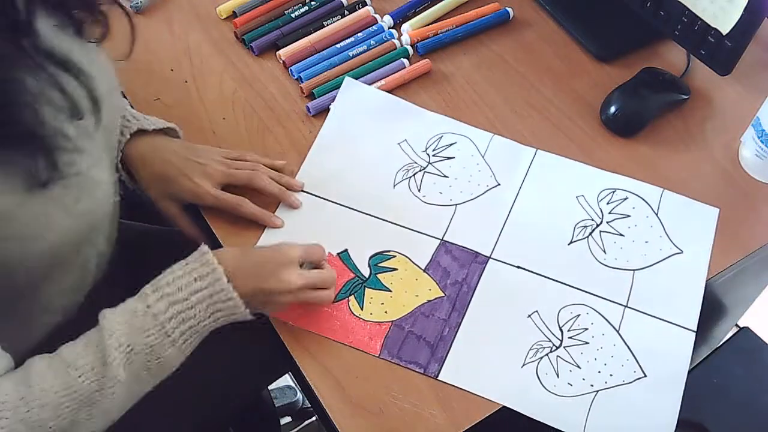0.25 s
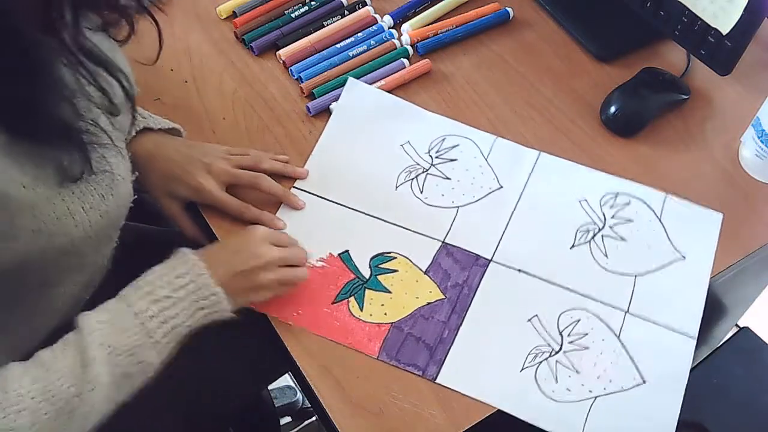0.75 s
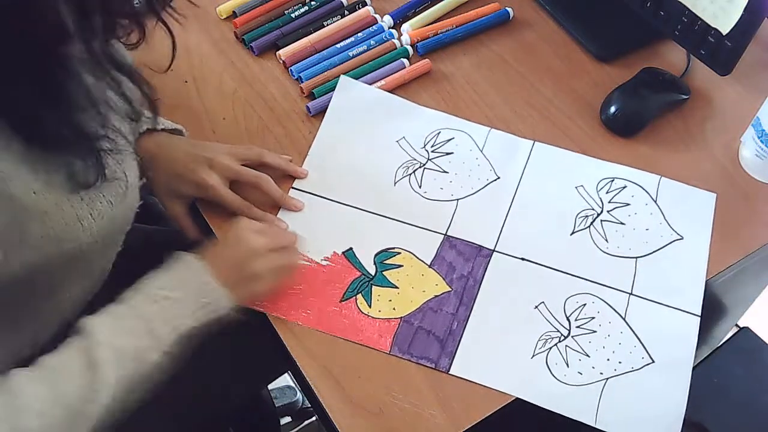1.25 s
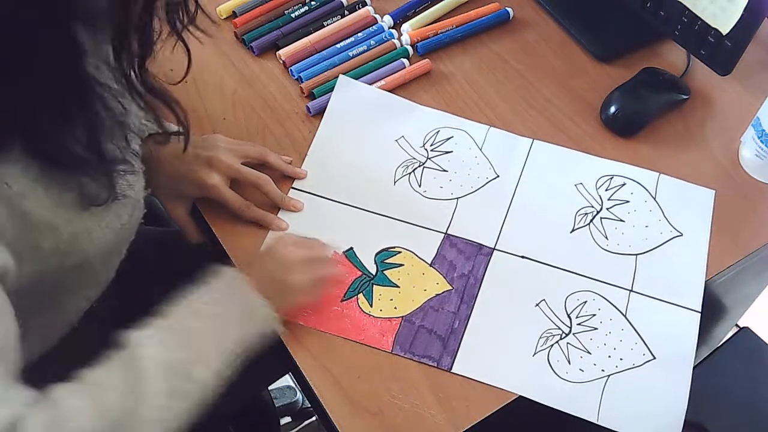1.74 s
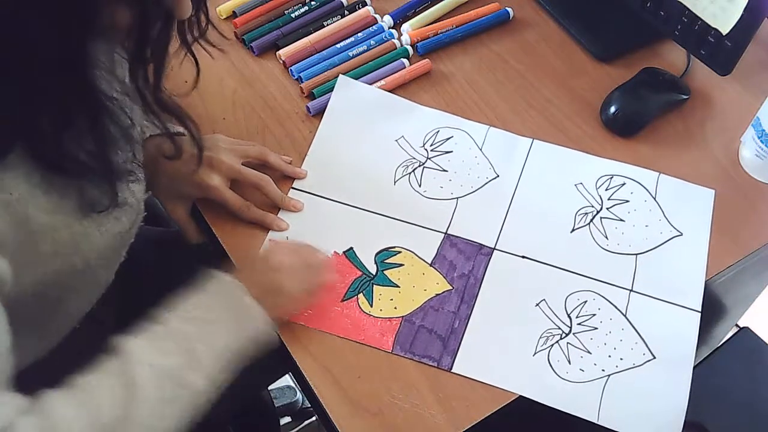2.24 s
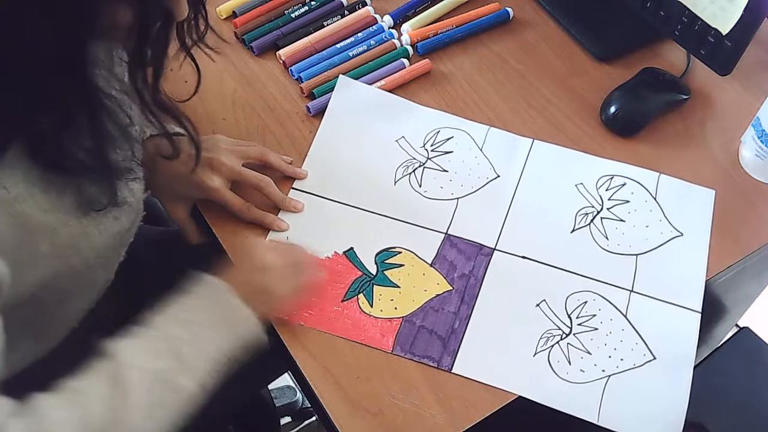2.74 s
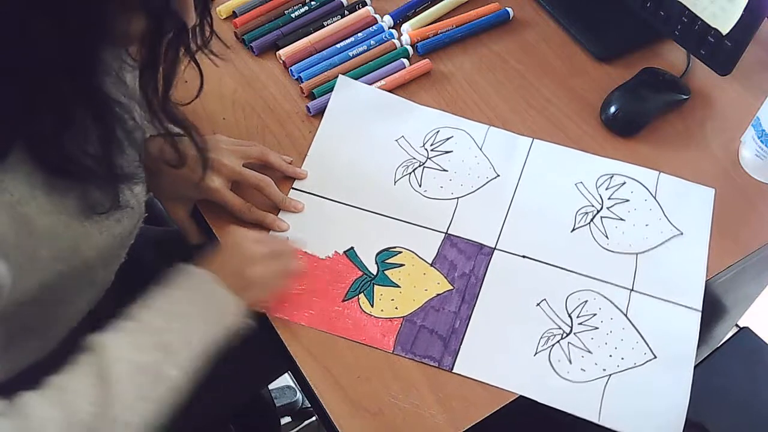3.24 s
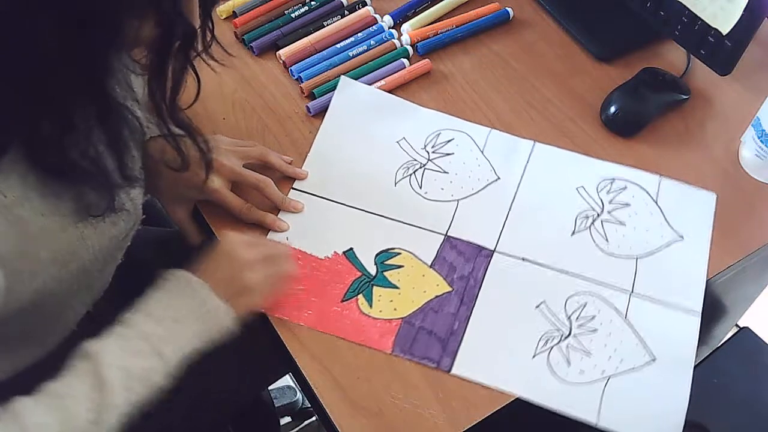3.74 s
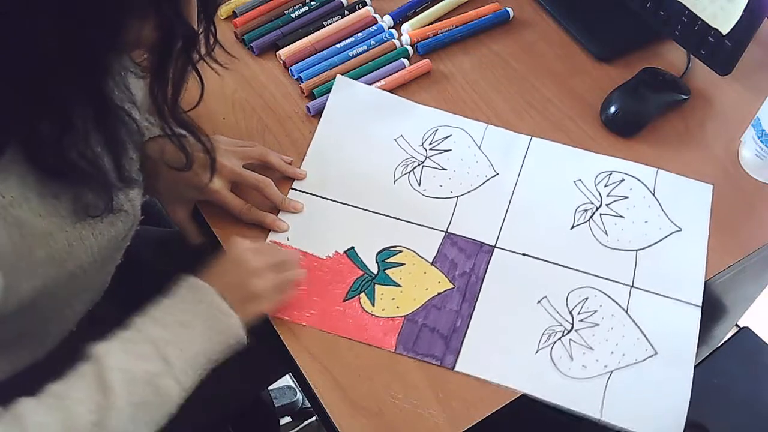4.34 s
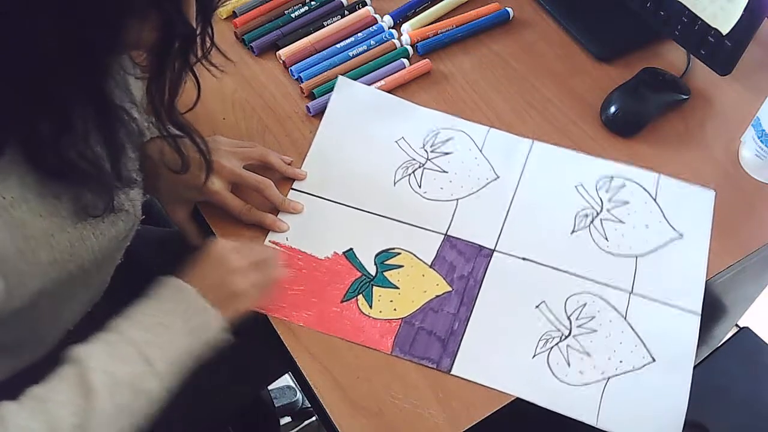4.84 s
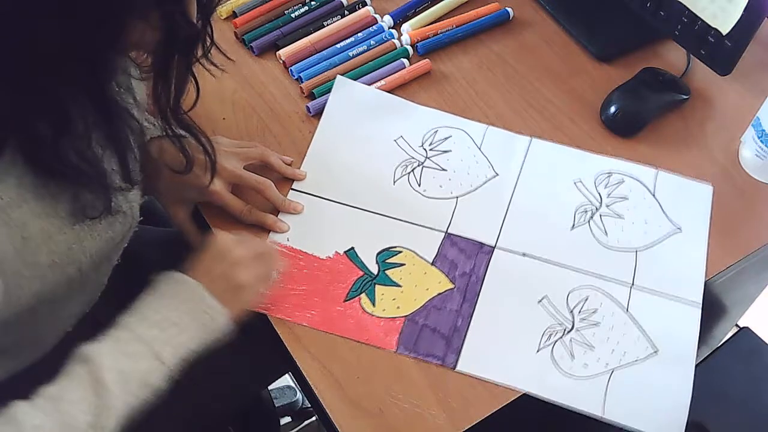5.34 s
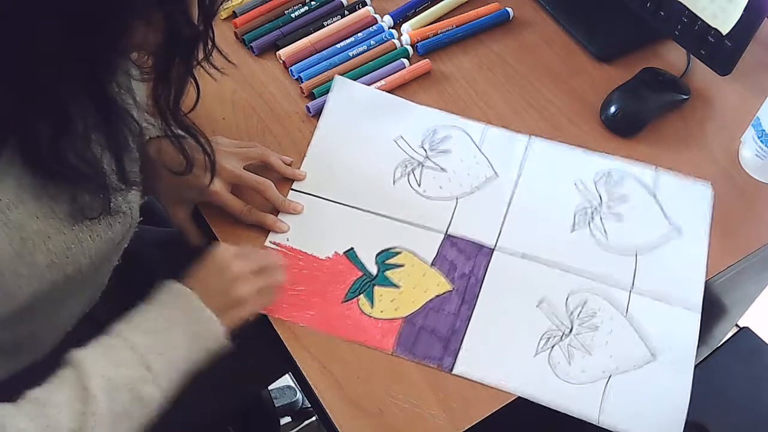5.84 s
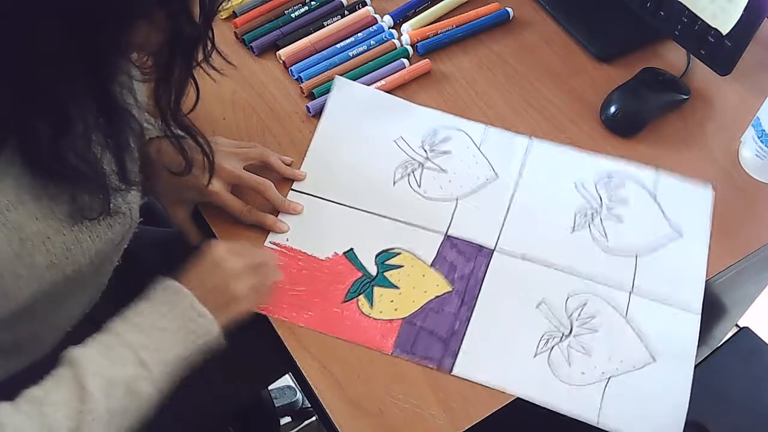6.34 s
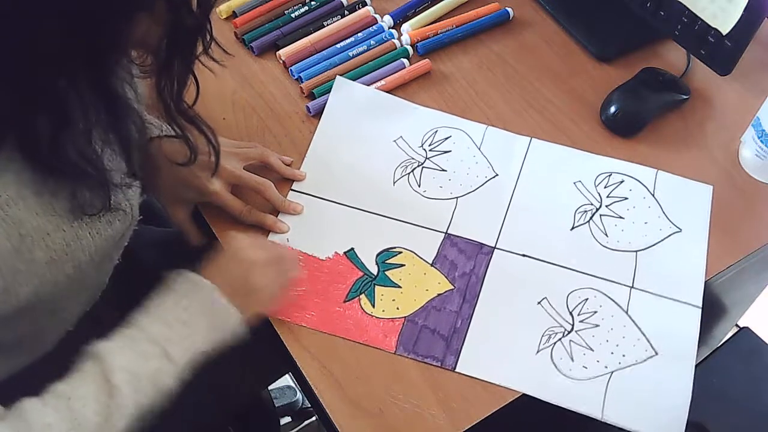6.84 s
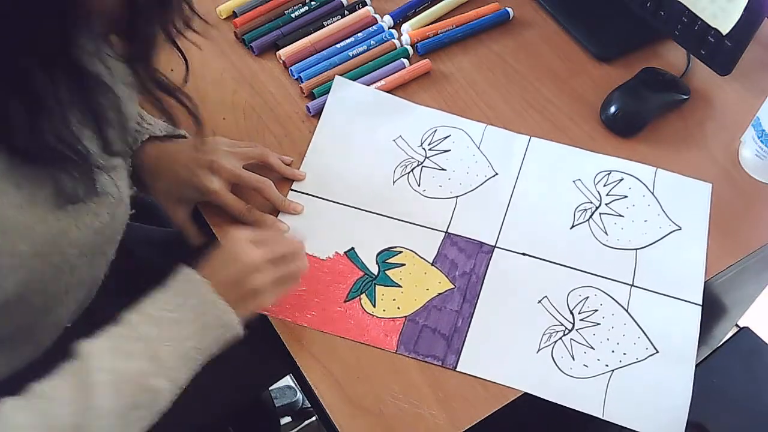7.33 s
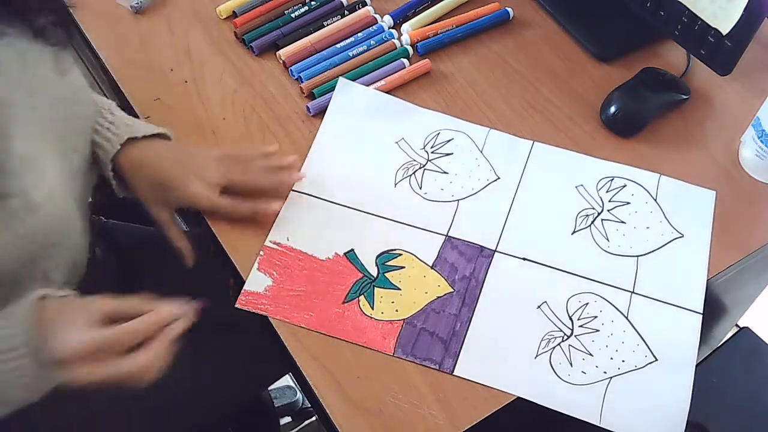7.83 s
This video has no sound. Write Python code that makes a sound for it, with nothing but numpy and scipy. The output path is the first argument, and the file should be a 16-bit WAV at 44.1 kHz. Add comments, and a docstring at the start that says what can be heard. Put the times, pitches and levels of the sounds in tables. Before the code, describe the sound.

A crayon scrubs paper in fast, dry back-and-forth strokes on a wooden desk, with crisp paper ticks, soft low thuds and faint hiss.

```python
"""A wax crayon scrubs back and forth on paper, mostly eight to ten strokes a second: noise grains, shaped
by each stroke's rise and fall, are coloured into scrape, grind, sizzle, whisper, bite and grit.
The paper snaps now and then (decaying clicks), and the wooden desk shakes and thuds (noise through low
resonances, short damped tones) over quiet room air and faint wavering whines.
A phone above the desk adds its own hiss and the bright resonances of its two microphone ports."""
import sys
import numpy as np
from scipy import signal
from scipy.fft import rfft, irfft, next_fast_len
from scipy.io import wavfile
from scipy.ndimage import map_coordinates

SR = 44100
rng = np.random.default_rng(int(sys.argv[2]) if len(sys.argv) > 2 else 0)


def generate_wav(sig):
    """Save sig (samples, or channels by samples) to the path in sys.argv[1] as 16-bit PCM at SR."""
    pcm = np.round(np.clip(np.atleast_2d(sig).T, -1, 1) * 32767).astype(np.int16)
    wavfile.write(sys.argv[1], SR, pcm)


def to_linear_factor(level_db):
    """Convert decibel levels (scalar or array-like) to linear amplitude factors."""
    exponent = np.asarray(level_db, float) / 20
    return 10 ** exponent


N = 356769

# crayon strokes: start_s, length_s, share of the length spent speeding up (0-1), relative level_db
STROKES = [(-0.058, 0.26, 0.65, -40.5), (0.356, 0.125, 0.45, -37.5), (0.636, 0.093, 0.73, -33),
           (0.758, 0.14, 0.45, -29.5), (0.91, 0.097, 0.8, -35), (1.039, 0.094, 0.17, -35),
           (1.195, 0.082, 0.8, -36), (1.316, 0.087, 0.74, -36.5), (1.448, 0.087, 0.45, -35),
           (1.59, 0.074, 0.55, -30), (1.718, 0.084, 0.54, -34.5), (1.82, 0.11, 0.67, -37.5),
           (1.959, 0.098, 0.4, -38.5), (2.086, 0.094, 0.55, -35), (2.215, 0.089, 0.7, -33),
           (2.334, 0.077, 0.38, -29), (2.448, 0.12, 0.56, -33.5), (2.583, 0.072, 0.26, -31.5),
           (2.696, 0.086, 0.04, -35), (2.81, 0.087, 0.1, -36), (2.934, 0.12, 0.4, -41),
           (3.059, 0.074, 0.09, -32), (3.181, 0.081, 0.5, -35.5), (3.288, 0.07, 0.14, -31),
           (3.41, 0.07, 0.54, -31), (3.52, 0.076, 0.2, -30), (3.635, 0.072, 0.5, -31.5),
           (3.743, 0.066, 0.56, -32.5), (3.852, 0.069, 0.57, -32.0), (3.949, 0.1, 0.75, -39.5),
           (4.086, 0.091, 0.54, -37.0), (4.204, 0.09, 0.16, -29.0), (4.316, 0.076, 0.38, -32),
           (4.424, 0.062, 0.38, -29.5), (4.532, 0.064, 0.33, -28.5), (4.645, 0.062, 0.37, -27),
           (4.756, 0.084, 0.62, -30.5), (4.869, 0.083, 0.35, -33.5), (4.98, 0.072, 0.5, -36.5),
           (5.083, 0.061, 0.25, -33.5), (5.296, 0.063, 0.08, -32), (5.406, 0.13, 0, -35),
           (5.53, 0.064, 0.28, -30.5), (5.629, 0.052, 0.23, -29.5), (5.732, 0.053, 0.43, -28),
           (5.832, 0.06, 0.42, -28.5), (5.939, 0.062, 0.5, -29), (6.05, 0.059, 0.37, -27.5),
           (6.152, 0.064, 0.4, -28.5), (6.258, 0.074, 0.52, -29.5), (6.363, 0.055, 0.47, -29.5),
           (6.457, 0.088, 0.75, -34), (6.566, 0.082, 0.23, -35.5), (6.679, 0.07, 0.6, -40.5),
           (6.79, 0.058, 1, -35.5), (6.874, 0.077, 0.1, -43), (6.986, 0.065, 0.8, -45),
           (7.074, 0.093, 0.86, -42), (7.298, 0.107, 0.6, -46), (7.423, 0.091, 0.6, -42.5),
           (7.542, 0.03, 0.18, -36.5), (7.786, 0.19, 0.5, -44.5)]
# changing colour of the strokes: time_s, sizzle_db and bite_db against the stroke, grind_db against its usual share
HAND = [(0.1, -14, -24, -3), (0.42, 0, -16, -4), (0.7, -15, -20, -0.5), (0.9, -9, -13.5, -1),
        (2.2, -11.5, -19, -2.5), (3.7, -14.5, -29, 1.3), (4.6, -15, -40, 0.7), (6.2, -24, -30, 0.7),
        (7.5, -23.5, -26, -2)]
# spectrum of wax scraping on paper: frequency_hz, relative density_db
SCRAPE = [(3500, -10.5), (5000, 0.5), (8000, -7.5), (11000, -13)]
# spectrum of the crisp treble of wax and paper: frequency_hz, relative density_db
SIZZLE = [(2500, -28), (6000, -8), (9000, 3.5), (12000, 0.5), (16000, -1)]


def unit(x):
    """Normalization: scales x to an rms of 1."""
    return x / np.sqrt(np.mean(x ** 2) + 1e-20)


def filtered(x, response):
    """Linear filtering: multiplies the spectrum of x by a complex response of frequency."""
    size = next_fast_len(N + SR // 2)
    spectrum = rfft(x, size) * response(np.fft.rfftfreq(size, 1 / SR))
    return irfft(spectrum, size)[..., :N]


def coloured(x, points):
    """Minimum-phase filtering through (Hz, dB) points: clicks keep a sharp front, white noise its rms."""
    hz, db = np.transpose(points)
    size = 4096
    f = np.fft.rfftfreq(size, 1 / SR)
    gain_db = np.interp(np.log(f + 1), np.log(hz), db)
    cepstrum = irfft(np.log(to_linear_factor(gain_db)))
    # folding the cepstrum onto positive time makes the pulse causal
    cepstrum[1:size // 2] *= 2
    cepstrum[size // 2 + 1:] = 0
    pulse = irfft(np.exp(rfft(cepstrum)))
    pulse = pulse[None] / np.linalg.norm(pulse)
    return signal.fftconvolve(np.atleast_2d(x), pulse, axes=1)[:, :N]


def resonance(f, hz, width_hz):
    """Damped oscillator: one causal resonance with gain 1 at its centre."""
    return 1j * f * width_hz / (hz * hz - f * f + 1j * f * width_hz)


def wobble(rate):
    """Slow random modulation: a smooth curve through random knots, rate knots a second."""
    knots = rng.standard_normal(int(N * rate / SR) + 4)
    return map_coordinates(knots, [np.arange(N) * rate / SR])


def pair(alike):
    """Partial coherence: two noises whose common part carries the share `alike` of their power."""
    common, left, right = rng.standard_normal((3, N))
    return np.sqrt(alike) * common + np.sqrt(1 - alike) * np.array([left, right])


def background():
    """Broadband ambience and pure tones: low room air, and thin whines that waver in level."""
    # room air: frequency_hz, relative density_db
    air = [(75, -5.5), (150, -7), (250, -15.5), (450, -21), (800, -32.5), (3000, -39.5), (9000, -35)]
    # faint whines: frequency_hz, mean level_db
    whines = [(1116, -67.5), (2826, -65.5)]
    t = np.arange(N) / SR
    whine = sum(to_linear_factor(db + 1.4 * wobble(2.87)) * np.sin(2 * np.pi * hz * t) for hz, db in whines)
    return to_linear_factor(-44.0) * coloured(pair(alike=0.46), air) + whine


def thuds(rise):
    """Impulsive excitation: under a soft push the desk top swells for a few cycles and fades (rise in s)."""
    # the hand bears down on the desk: time_s, level_db
    presses = [(0.672, -33), (0.964, -33.5), (1.267, -36.5), (1.796, -31), (2.523, -35.5), (2.77, -31),
               (3.756, -35), (4.225, -34), (4.43, -35), (4.825, -37), (5.257, -31.5), (5.643, -36),
               (6.07, -31), (6.305, -36)]
    # what the desk top rings with under a push: frequency_hz, level_db against the push
    top_modes = [(106, 1), (195, -12), (385, -19.5)]
    # the side of the hand scuffs the desk once: time_s, level_db, frequency_hz
    scuff_s, scuff_db, scuff_hz = (0.838, -44, 385)
    out, t = np.zeros(N + SR), np.arange(SR // 4) / SR
    swell = t / rise * np.exp(1 - t / rise)
    pushes = [(s, db, top_modes) for s, db in presses]
    pushes.append((scuff_s, scuff_db, [(scuff_hz, 0)]))
    for s, db, modes in pushes:
        ring = 0
        for hz, level_db in modes:
            pitch_hz = hz * (1 + 0.0645 * rng.standard_normal())  # each push is tuned a little differently
            ring = ring + to_linear_factor(level_db) * np.sin(2 * np.pi * pitch_hz * t + rng.random())
        out[round((s - rise / 2) * SR):][:len(t)] += to_linear_factor(db) * swell * ring
    return out[:N]


def desk():
    """Modal vibration: the arm's effort and two lurches drive low modes, nearly alike at both ports."""
    # desk modes: frequency_hz, width_hz, level_db at reference effort,
    # effort slope (dB per dB of effort), lurch_db (gain under a lurch)
    modes = [(27.94, 8.7, -45, 0, -0.5), (48.7, 17.6, -44.5, 0, -6.5), (75.7, 26, -55, 3, -7),
             (101.2, 23.7, -44.5, 1.1, -21), (198, 95, -58, 1, -18.5), (377, 200, -62, 0, -23.5)]
    # effort of the working arm: time_s, level_db against the reference effort
    arm = [(0, -7), (3.2, 0), (5.1, -0.5), (6.3, 1), (6.9, -5), (8.09, -9)]
    # the body leans and the desk lurches: time_s, level_db, loss in dB per octave above the lowest mode
    lurches = [(4.2, -28.5, 1), (4.6, -32, 10)]
    lurch_rise_s, lurch_fall_s = 0.051, 0.2
    t = np.arange(N) / SR
    effort_db = np.interp(t, *np.transpose(arm))
    out = np.zeros((2, N))
    for hz, width_hz, db, follows, lurch_db in modes:
        mode = unit(filtered(pair(alike=0.93), lambda f: resonance(f, hz, width_hz) ** 2))
        octaves = np.log2(hz / modes[0][0])
        lurch_power = 0
        for s, level_db, loss_db in lurches:
            flank_s = np.where(t < s, lurch_rise_s, lurch_fall_s)
            lurch_power = lurch_power + to_linear_factor(2 * (level_db - loss_db * octaves)) * np.exp(-((t - s) / flank_s) ** 2)
        power = to_linear_factor(2 * (db + follows * effort_db)) + to_linear_factor(2 * lurch_db) * lurch_power
        out += np.sqrt(power) * mode
    return out + thuds(rise=0.02183)


def snaps():
    """Buckling: the sheet gives a sharp click and a short crackle; strokes set off with a tick of their own."""
    # paper snaps: time_s, level_db before colouring, crisp_db (treble against the body)
    buckles = [(0.4588, -18, -17), (0.7298, -19, -14), (0.829, -23, 8), (0.8586, -27, 13),
               (1.179, -18, -10), (0.8626, -8.5, -9), (1.6945, -4.5, -11), (1.7308, -15, -12),
               (1.7472, -13, -10), (1.7968, -22, 3), (2.195, -21, -1), (2.352, -20.5, 8),
               (2.4508, -14.5, -13), (3.3021, -11.5, -6), (4.0262, -19, -4), (6.4587, -23.5, -10),
               (7.5508, -24, -10)]
    # spectrum of a snap's body: frequency_hz, relative density_db
    body_colour = [(1500, -34), (3000, -8.5), (6500, -1), (9000, -3.5), (15000, -21.5)]
    # the wax breaks loose: dB over the stroke's level, dB lost per ms of speeding up
    catch_db, catch_loss_db = 11, 0.7
    catches = []
    for s, length, share, db in STROKES:
        rise = share * length
        catches.append((s + rise / 2, db + catch_db - catch_loss_db * 1e3 * rise, -6))
    body, crisp, t = np.zeros((2, N + SR)), np.zeros((2, N + SR)), np.arange(900) / SR
    for s, db, crisp_db in buckles + catches:
        click = 0.18 * to_linear_factor(-60 * t / 0.014) * rng.standard_normal((2, len(t)))
        click[:, 0] = 1
        start = round(s * SR)
        body[:, start:start + len(t)] += to_linear_factor(db) * click
        crisp[:, start:start + len(t)] += to_linear_factor(db + crisp_db) * click
    return coloured(body[:, :N], body_colour) + coloured(crisp[:, :N], SIZZLE)


def grains(alike, uneven_db, clump_db):
    """Stick-slip friction: wax catches on fibres in countless uneven, clumped slips.
    The moving tip shakes the whole sheet, so the two ports hear the slips only partly alike."""
    clumps = np.tanh(0.5 * (wobble(350) + 2.1 * wobble(60)))
    size_db = uneven_db * rng.standard_normal(N) + clump_db * clumps
    return unit(to_linear_factor(size_db) * pair(alike))


def hand_db(column):
    """Slow change of timbre: one column of HAND at the start of each stroke."""
    table = np.array(HAND)
    return np.interp(np.transpose(STROKES)[0], table[:, 0], table[:, column])


def stroke_level(offset_db=0, gathers=1):
    """Amplitude envelope: each stroke speeds up and slows down; higher `gathers` narrows it to its peak."""
    s, length, share, db = np.transpose(STROKES)[:, :, None]
    share = np.clip(share, 0.05, 0.95)
    rise, fall = share * length, (1 - share) * length
    step = 32  # samples between envelope points
    lag = np.arange(0, N + step, step) / SR - s - rise
    flank = np.where(lag < 0, rise, fall)
    # exponent 2 is a bell-shaped flank, more gives a flatter top and a steeper end
    squareness = np.where(lag < 0, 2.9, 1.92)
    power = np.exp(-2 * np.abs(lag / flank) ** squareness)
    level_db = db + np.reshape(offset_db, (-1, 1))
    level = np.sqrt(np.sum(to_linear_factor(2 * level_db) * power ** gathers, axis=0))
    return np.interp(np.arange(N), step * np.arange(len(level)), level)


def scrape(slips):
    """Broadband friction noise: the thin scrape fades faster than the stroke as it lightens."""
    return coloured(to_linear_factor(-8.0) * stroke_level() ** 1.137 * slips, SCRAPE)


def grind(slips):
    """Pressure-dependent friction: the deeper grind grows faster than the stroke's level."""
    # spectrum of the grind: frequency_hz, relative density_db
    colour = [(300, -29.5), (2100, -14), (2800, 0), (3600, -7), (4500, 5.5), (5200, -10)]
    effort = stroke_level(hand_db(3)) ** 1.348  # the grind needs pressure
    return coloured(effort * slips, colour)


def sizzle():
    """Speed-dependent friction: treble grains gather at the fastest part of a stroke."""
    level = stroke_level(hand_db(1), gathers=2.4)
    return coloured(level * grains(alike=0.1, uneven_db=1.0, clump_db=7.5), SIZZLE)


def whisper(slips):
    """Narrow-band resonance: plainest in light strokes, it lingers between them."""
    hz, width_hz = 5680, 300
    level = stroke_level(gathers=0.66) ** 0.68  # grows slower than the stroke
    tone = filtered(level * slips, lambda f: resonance(f, hz, width_hz))
    return to_linear_factor(-41.5) * tone * np.sqrt(SR / width_hz)


def bite():
    """Resonant friction: a doubled resonance forms the bright edge, strongest in the early strokes."""
    # resonance of the bite: frequency_hz, width_hz (of each of the two passes)
    hz, width_hz = (6660, 1900)
    slips = stroke_level(hand_db(2)) * grains(alike=0.65, uneven_db=0.5, clump_db=7)
    return filtered(slips, lambda f: resonance(f, hz, width_hz) ** 2) * np.sqrt(SR / width_hz)


def grit():
    """Random impulses: hard specks in the wax tick on their own, alike at both ports."""
    per_s, level_db, spread_db = 220, 5.5, 3.5  # mean rate, dB against the stroke, dB spread of sizes
    chance, size = rng.random(N), rng.exponential(size=N)
    ticks = to_linear_factor(level_db + spread_db * np.minimum(size, 2)) * (chance < per_s / SR) * stroke_level()
    return coloured(ticks * np.ones((2, 1)), SCRAPE)


def strokes():
    """Superposition: one stream of slips feeds scrape, grind and whisper; the other layers have their own."""
    slips = grains(alike=0.41, uneven_db=1.0, clump_db=3.5)
    return scrape(slips) + grind(slips) + sizzle() + whisper(slips) + bite() + grit()


def room(x, t60):
    """Reverberation: desk top and near walls answer briefly, differently at each port (t60 in s)."""
    t = np.arange(SR // 5) / SR
    tail = rng.standard_normal((2, len(t))) * to_linear_factor(-60 * t / t60) * (t > 0.0006)
    tail = tail / np.linalg.norm(tail, axis=1, keepdims=True)
    return signal.fftconvolve(x, tail, axes=1)[:, :N]


def crayon():
    """Propagation delay: strokes and snaps reach the ports a moment apart, then come back off desk and walls."""
    lag_s = np.array([[0.00003], [0]])  # the left port is further from the hand
    sheet = strokes() + snaps()
    direct = filtered(sheet, lambda f: np.exp(-2j * np.pi * f * lag_s))
    return direct + to_linear_factor(-14.0) * room(sheet, t60=0.17)


def scene():
    """Superposition of crayon, desk and room."""
    return background() + desk() + crayon()


def low_pass(x):
    """Removes everything above the highest recorded frequency."""
    return signal.sosfilt(signal.butter(12, 17000, fs=SR, output="sos"), x)


def record(dry):
    """Port resonance: each port rings near 6 and 15 kHz, each microphone hisses, the top band is cut by 41 dB."""
    # left and right port, two resonances each: frequency_hz, width_hz, level_db against the direct path
    ports = [
        [(5690, 690, 11.5), (15700, 1800, 4.5)],
        [(5774, 474, 14), (14950, 1400, 6.5)],
    ]
    # microphone hiss: frequency_hz, relative density_db
    hiss_colour = [(20, 14), (1000, 2), (3000, 0.5), (16000, -2)]
    top_hz = 15750

    def port_response(f):
        """Direct path plus resonances, one row a port."""
        return np.array([1 + sum(to_linear_factor(db) * resonance(f, hz, width_hz) for hz, width_hz, db in port)
                         for port in ports])

    hiss = to_linear_factor(-41) * coloured(rng.standard_normal((2, N)), hiss_colour)
    heard = filtered(dry, port_response) + hiss
    limited = filtered(heard, lambda f: np.where(f < top_hz, 1, to_linear_factor(-41)))
    return low_pass(limited)


dry = scene()
out = record(dry)
generate_wav(out)
```